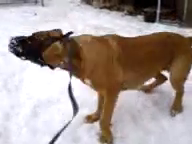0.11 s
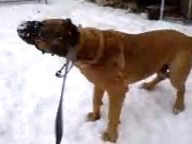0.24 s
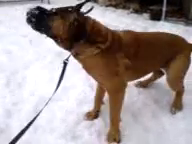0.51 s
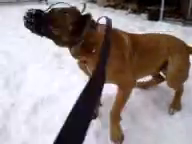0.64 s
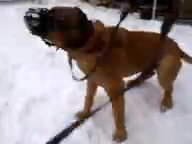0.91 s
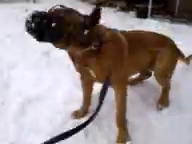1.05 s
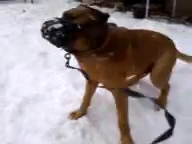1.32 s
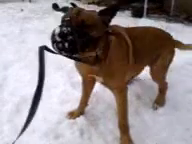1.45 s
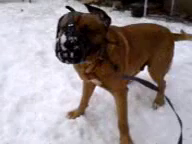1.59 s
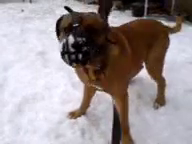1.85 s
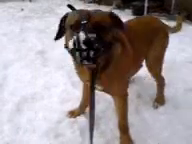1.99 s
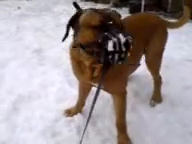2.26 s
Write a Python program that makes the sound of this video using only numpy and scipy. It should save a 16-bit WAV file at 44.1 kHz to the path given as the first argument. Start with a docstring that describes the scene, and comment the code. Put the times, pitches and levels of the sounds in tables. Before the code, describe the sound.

Close up outdoors, a dog's leash hardware clacks and clinks on its muzzle over softly rustling, flapping webbing. The clatter grows busier, with hollow knocks and slight crackle on the loudest hits, before settling to faint ticks.

```python
"""A leash clip and buckles clack against a dog's muzzle as it tosses its head in the snow.
Each clack is a scrape and a chatter of impacts; square blows ring the basket hollow.
Metal parts clink and jingle, the slack webbing flaps, and webbing and coat rustle in tiny slips.
A close, narrow-band microphone peaks near 3.4 kHz; the loudest knocks carry bright overload crackle."""
import sys
import numpy as np
from scipy import signal
from scipy.fft import rfft, irfft
from scipy.io import wavfile
from scipy.ndimage import uniform_filter1d, minimum_filter1d

SR = 44100
rng = np.random.default_rng(int(sys.argv[2]) if len(sys.argv) > 2 else 0)


def int16_out(signal):
    """Quantize to a 16-bit WAV file."""
    q = np.round(np.clip(np.atleast_2d(signal).T, -1, 1) * 32767)
    wavfile.write(sys.argv[1], SR, q.astype(np.int16))


N = 105840  # 2.4 s


def amp(db):
    return 10 ** (np.asarray(db) / 20)


def unit(x):
    """Scale to rms 1."""
    return x / np.sqrt(np.mean(x ** 2) + 1e-20)


def add(mix, start_s, sound):
    """Mix a sound in at start_s."""
    part = mix[max(0, round(start_s * SR)):][:len(sound)]
    part += sound[:len(part)]


def colour(x, points, size=4096):
    """Minimum-phase filter through points of f/Hz, gain/dB."""
    hz, db = np.transpose(points)
    log_hz = np.log(abs(np.fft.fftfreq(size, 1 / SR)) + 1)
    log_gain = np.log(amp(np.interp(log_hz, np.log(hz), db)))
    taps = np.fft.ifft(np.exp(np.conj(signal.hilbert(log_gain)))).real
    return signal.fftconvolve(x, taps[:size // 2])[:len(x)]


def drift(rate_hz):
    """Low-passed noise, rms 1."""
    hz = np.fft.rfftfreq(N, 1 / SR)
    return unit(irfft(rfft(rng.standard_normal(N)) * np.exp(-(hz / rate_hz) ** 2), N))


# Microphone response: f/Hz, gain/dB
MIC_RESPONSE = [(20, -34), (55, -19.5), (130, -15), (290, -10), (900, -9.5), (1700, -8), (2500, -3),
                (3050, -0.5), (3420, -0.5), (3560, -12), (3750, -16.5), (4050, -24.5), (4450, -34.5),
                (4800, -60.5), (5400, -102)]

def microphone(x):
    """Narrow band: resonant near 3.4 kHz, steep roll-off above."""
    return colour(x, MIC_RESPONSE)


def rubbing(spectrum, flutter_db, flutter_hz, slips_per_s=3500, spread_db=2.5):
    """Dense tiny slips that come in clumps; rms 1."""
    slips = (rng.random(N) < slips_per_s / SR) * rng.choice([-1, 1], N)
    strength = amp(spread_db * np.minimum(rng.exponential(1, N), 4))
    clumps = amp(flutter_db * drift(flutter_hz))
    return unit(microphone(colour(slips * strength * clumps, spectrum)))


# Rubbing spectra: f/Hz, gain/dB
BODY_SPECTRUM = [(30, -1), (150, -1.5), (320, -1), (600, 1.5), (1200, 0), (1700, 0.5), (2400, -19.5)]
TREBLE_SPECTRUM = [(900, -25.5), (1500, -8.5), (2000, -3), (3050, -1.5), (3350, 1), (3800, -2), (4500, -3)]
# Rustle envelope, before trim: t/s, body level/dB, treble level/dB
RUSTLE_LEVELS = [(0, -45.5, -34), (0.07, -38.5, -39.5), (0.115, -44.5, -30.5), (0.159, -48.5, -41),
                 (0.246, -33, -24.5), (0.309, -45.5, -32), (0.41, -40.5, -31.5), (0.46, -34.5, -31),
                 (0.548, -40, -25), (0.603, -36, -33.5), (0.681, -40, -26), (0.82, -41, -27.5),
                 (0.92, -40, -29), (0.999, -39.5, -24.5), (1.151, -35.5, -22.5), (1.319, -33.5, -26),
                 (1.42, -35.5, -23.5), (1.55, -34, -24.5), (1.66, -33.5, -23.5), (1.738, -38, -23.5),
                 (1.809, -41, -33.5), (1.88, -42.5, -28), (2.0, -42.5, -37.5), (2.122, -42.5, -31),
                 (2.18, -47, -34), (2.4, -47, -33)]

def rustle(body_trim_db=-0.75, treble_trim_db=-2.5):
    """Webbing and coat rub harder while the head swings."""
    times_s, body_db, treble_db = np.transpose(RUSTLE_LEVELS)
    t = np.arange(N) / SR
    body = rubbing(BODY_SPECTRUM, flutter_db=2.5, flutter_hz=60)
    body *= amp(body_trim_db + np.interp(t, times_s, body_db))
    treble = rubbing(TREBLE_SPECTRUM, flutter_db=2.0, flutter_hz=83)
    treble *= amp(treble_trim_db + np.interp(t, times_s, treble_db))
    return body + treble


def jingle(touches_per_s=36, length_s=0.0093, pitch_hz=3426, spread_hz=30, trim_db=-2.5):
    """Loose rings keep touching faintly; their level follows the treble rustle."""
    times_s, _, treble_db = np.transpose(RUSTLE_LEVELS)
    mix = np.zeros(N)
    t = np.arange(0, length_s, 1 / SR)
    envelope = np.sin(np.pi * t / length_s) ** 2
    chance, detune = rng.random(N), rng.standard_normal(N)
    for i in np.flatnonzero(chance < touches_per_s / SR):
        tone = np.sin(2 * np.pi * (pitch_hz + spread_hz * detune[i]) * t)
        level_db = trim_db + np.interp(i / SR, times_s, treble_db)
        add(mix, i / SR, amp(level_db) * unit(envelope * tone))
    return mix


# Webbing flaps: t/s, length/s, f/Hz, level/dB
STRAP_FLAPS = [(0.087, 0.059, 394, -41), (.887, 0.016, 258, -33.5), (.886, 0.024, 110, -43.5),
               (1.015, 0.016, 118.5, -38.5), (1.252, 0.013, 330, -28.5), (1.274, 0.027, 136, -39.5),
               (1.464, .022, 310, -28), (1.705, 0.0096, 650, -30.5)]

def flap(length_s, hz, db, width_oct=0.52, size=4096):
    """The slack strap gives a soft, dull puff."""
    progress = np.arange(0, length_s, 1 / SR) / length_s
    octaves = np.log2((np.fft.rfftfreq(size, 1 / SR) + 1) / hz)
    puff = irfft(rfft(rng.standard_normal(size)) * np.exp(-0.5 * (octaves / width_oct) ** 2))
    envelope = np.sin(np.pi * np.sqrt(progress)) ** 2
    return amp(db) * unit(envelope * puff[:len(progress)])


# Light metal-on-metal touches: t/s, length/s, f/Hz, level/dB, scratchiness (0-1)
METAL_CLINKS = [(0.114, 0.0077, 3490, -30.5, .6), (0.2156, 0.012, 3410, -16, 0.13),
                (0.2615, 0.0094, 3460, -20, 0.36), (0.3255, 0.01, 3430, -19.5, 0.64),
                (0.485, 0.0096, 3510, -24.5, 0.47), (0.9555, 0.013, 3460, -14.5, 0.28),
                (1.0422, 0.0055, 3300, -13, 0.33), (1.188, 0.0078, 3150, -17, 0.4),
                (1.3952, 0.006, 3403, -19, 0.3), (1.672, 0.0064, 3380, -21, 0.5),
                (1.8317, 0.0061, 3405, -10, 0.15), (2.117, 0.0093, 3370, -30.5, 0.5)]

def clink(length_s, hz, db, scratchiness, width_hz=610, size=4096):
    """One high partial swells and dies, with a band of scratch just below it."""
    progress = np.arange(0, length_s, 1 / SR) / length_s
    band = np.exp(-((hz - width_hz - np.fft.rfftfreq(size, 1 / SR)) / width_hz) ** 2)
    scratch = irfft(rfft(rng.standard_normal(size)) * band)[:len(progress)]
    tone = np.sin(2 * np.pi * hz * length_s * progress)
    envelope = np.sin(np.pi * progress ** 0.81) ** 2  # peaks early
    return amp(db) * unit(envelope * (tone + scratchiness * unit(scratch)))


# Crackle spectrum: f/Hz, gain/dB
CRACKLE_SPECTRUM = [(2500, -8), (5000, -1), (9000, 1.5), (12000, -7.5), (15500, -14)]
# Crackles on the loudest knocks: t/s, level/dB
OVERLOAD_CRACKLES = [(.3702, -56.5), (0.618, -50.5), (0.6492, -28.5), (.780, -41), (1.0181, -37),
                     (1.067, -51.5), (1.178, -48), (1.276, -34.5), (1.625, -28), (1.6905, -19.5)]

def crackle(db, length_s=0.0018, ticks_per_s=4200, size=512):
    """Overload crackle on the loudest knocks: a tiny cluster of sharp ticks."""
    t = np.arange(size) / SR
    ticks = (rng.random(size) < ticks_per_s / SR) * (t < length_s) * rng.standard_normal(size)
    ticks[round(length_s / 2 * SR)] = 1
    return amp(db) * unit(colour(ticks, CRACKLE_SPECTRUM)) * np.sqrt(length_s * SR / size)


# Muzzle basket modes, main one first: frequency ratio, relative level/dB, t60/s
BASKET_MODES = [(1, 4, 0.033), (.68, -7.5, 0.031), (1.67, -0.5, 0.034)]

def basket(hz, other_modes_db, size=4096):
    """The muzzle rings; the spot struck sets the pitch and the share of the other modes."""
    t = np.arange(size) / SR
    ring = np.zeros(size)
    for k, (ratio, db, t60_s) in enumerate(BASKET_MODES):
        envelope = amp(db + other_modes_db * (k > 0) - 60 * t / t60_s)
        ring += envelope * np.sin(2 * np.pi * hz * ratio * t)
    return ring


# Square blows on the basket: t/s, f/Hz, gain/dB, gain of other modes/dB
HOLLOW_KNOCKS = [(1.0665, 862, -12.5, 3), (1.2755, 1024, -13.5, -5), (1.4795, 813, -13.5, 4.5),
                 (1.691, 950, -21, -3)]

def knock(hz, db, other_modes_db, rise_s=0.00079):
    """A square blow with soft contact rings the basket hollow."""
    ring = basket(hz, other_modes_db)
    t = np.arange(len(ring)) / SR
    return amp(db) * ring * (1 - np.exp(-(t / rise_s) ** 2))


# Edges of the thud, body, crack and ring bands: f/Hz
CLACK_BANDS_HZ = [150, 600, 1700, 3000, 4200]

def shape_bands(burst, length_s, levels_db):
    """Equalise a burst towards four band levels, taken as rms over length_s."""
    size = len(burst)
    edges_hz = np.array(CLACK_BANDS_HZ)
    centres_hz = np.sqrt(edges_hz[1:] * edges_hz[:-1])
    energy = 2 * abs(rfft(burst)) ** 2 / size
    band_energy, _ = np.histogram(np.fft.rfftfreq(size, 1 / SR), edges_hz, weights=energy)
    band_db = 10 * np.log10(band_energy / (length_s * SR))
    shaped = colour(burst, np.c_[centres_hz, levels_db - band_db])
    return unit(shaped) * np.sqrt(np.sum(amp(levels_db) ** 2) * length_s * SR / size)


IMPACTS_PER_S, IMPACT_SPREAD_DB = 2600, 0.5
SCRAPE_DB, SCRAPE_LEAD_S, SCRAPE_T60_S = -7.5, 0.0065, 0.055
BASKET_HZ, BASKET_SPREAD_OCT, BASKET_GAIN_DB = 862, 0.14, -46
# Clip and buckle hits, before trim: t/s, length/s, level/dB in each band (thud, body, crack, ring)
BUCKLE_CLACKS = [(0.235, 0.00082, -42.5, -20.5, -19, -23), (0.2747, 0.0015, -56.5, -35.5, -13.5, -18.5),
                 (0.3458, 0.0029, -47, -37, -16.5, -27.5), (0.369, 0.0032, -27, -22, -15, -14.5),
                 (0.3886, 0.0054, -35.5, -23, -17, -22.5), (0.5, 0.0041, -36, -23.5, -26, -23),
                 (0.515, 0.0021, -28, -25.5, -7, -20.5), (0.617, 0.006, -33.5, -21.5, -11, -20),
                 (0.625, 0.0011, -37, -24, -13.5, -18), (0.648, 0.0042, -31, -20.5, -16.5, -10),
                 (0.734, 0.0043, -30, -28, -23, -22.5), (0.7745, 0.0011, -30, -28, -15.5, -16),
                 (0.7784, 0.004, -33, -49, -12.5, -22.5), (0.846, 0.0081, -38.5, -18.5, -19.5, -21),
                 (0.857, 0.00081, -42, -21.5, -14.5, -17.5), (0.8876, 0.0035, -38, -39.5, -14.5, -19.5),
                 (1.016, 0.0051, -27.5, -26, -12, -12), (1.065, 0.0059, -26, -16, -19.5, -20.5),
                 (1.1716, 0.0028, -35.5, -40.5, -8, -24.5), (1.177, 0.0039, -47, -25.5, -18, -10),
                 (1.214, 0.0011, -62, -32, -23, -60), (1.2395, 0.0048, -32, -40, -24.5, -27),
                 (1.248, 0.0012, -35, -44, -24, -22), (1.2736, 0.0044, -33, -13.5, -18.5, -17),
                 (1.2807, 0.0086, -35, -32, -29, -17.5), (1.3737, 0.0023, -50, -33, -13.5, -29.5),
                 (1.381, 0.0025, -32.5, -22, -22.5, -61.5), (1.477, 0.0094, -25, -17.5, -22, -17),
                 (1.5022, 0.0027, -45.5, -22, -32, -23), (1.557, 0.0019, -33.5, -27, -8.5, -8.5),
                 (1.5647, 0.0011, -41, -52, -14.5, -19), (1.57, 0.008, -40, -25.5, -17.5, -25),
                 (1.5815, 0.0036, -42, -21, -15, -23), (1.625, 0.0024, -23.5, -49.5, -10.5, -16),
                 (1.631, 0.0083, -33.5, -47, -32, -23.5), (1.686, 0.00072, -38, -28, -8.5, -19),
                 (1.6891, 0.003, -29.5, -15.5, -14, -7), (1.7, 0.011, -34, -45, -27, -28),
                 (1.7778, 0.0026, -54, -33.5, -21.5, -20.5), (2.201, 0.0007, -34.5, -28.5, -19, -25.5),
                 (2.2893, 0.0012, -49.5, -60, -20, -32)]

def clack(length_s, levels_db, trim_db=1.8, size=4096):
    """Clip or buckle scrapes, then chatters on the basket; the spot struck sets the colour."""
    t = np.arange(size) / SR - SCRAPE_LEAD_S
    contacts = (rng.random(size) < IMPACTS_PER_S / SR) * (t > 0) * (t < length_s)
    strength, polarity, scrape = rng.standard_normal((3, size))
    impacts = contacts * np.sign(polarity) * amp(-IMPACT_SPREAD_DB * strength)
    impacts[round((SCRAPE_LEAD_S + length_s / 3) * SR)] = 1.53  # main impact
    scrape *= np.where(t < 0, 1 + t / SCRAPE_LEAD_S, amp(-60 * t / SCRAPE_T60_S))
    drive = unit(impacts) + amp(SCRAPE_DB) * unit(scrape)
    pitch_hz = BASKET_HZ * 2 ** (BASKET_SPREAD_OCT * rng.standard_normal())
    ring = signal.fftconvolve(drive, basket(pitch_hz, other_modes_db=0))[:size]
    burst = microphone(drive + amp(BASKET_GAIN_DB) * ring)
    return amp(trim_db) * shape_bands(burst, length_s, levels_db)


def scene(after_tick_s=0.013, after_tick_db=-40):
    """Leash and muzzle in the open air; dry, mono."""
    mix = rustle() + jingle()
    for start_s, length_s, *levels_db in BUCKLE_CLACKS:
        add(mix, start_s - SCRAPE_LEAD_S, clack(length_s, np.array(levels_db)))
    for start_s, db in OVERLOAD_CRACKLES:  # faint tick just after each of the loudest knocks
        add(mix, start_s + after_tick_s, crackle(db + after_tick_db))
    sources = (HOLLOW_KNOCKS, knock), (METAL_CLINKS, clink), (STRAP_FLAPS, flap)
    for table, sound in *sources, (OVERLOAD_CRACKLES, crackle):
        for start_s, *settings in table:
            add(mix, start_s, sound(*settings))
    return mix[None]


def record(dry, ceiling=0.75, cutoff_hz=16750):
    """Fast, smooth peak limiter, then a low-pass."""
    gain = minimum_filter1d(np.minimum(1, ceiling / (abs(dry) + 1e-9)), size=101)
    for _ in range(3):
        gain = uniform_filter1d(gain, size=41)
    lowpass = signal.firwin(511, cutoff_hz, window=("kaiser", 9), fs=SR)
    return signal.oaconvolve(dry * gain, lowpass[None], "same")


dry = scene()
out = record(dry)
int16_out(out)
```